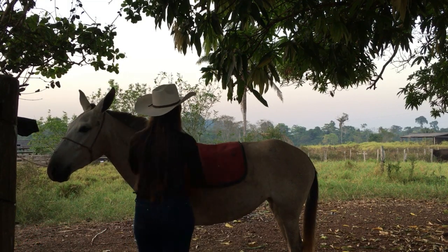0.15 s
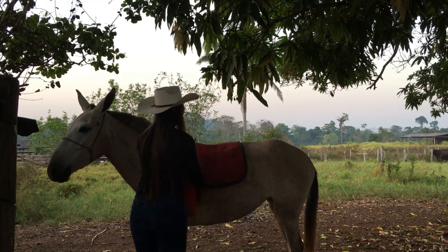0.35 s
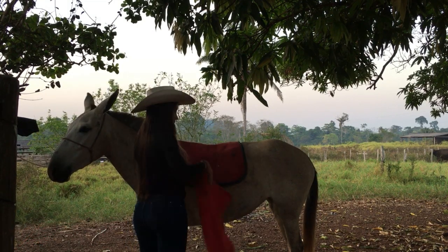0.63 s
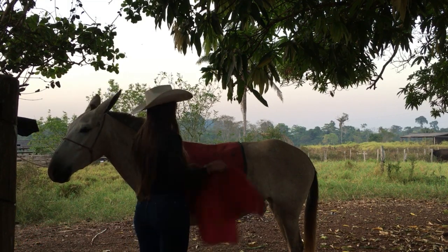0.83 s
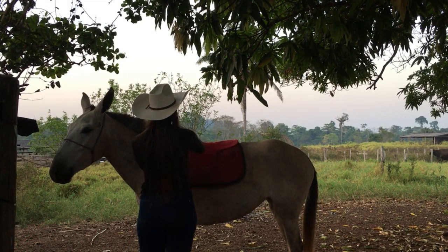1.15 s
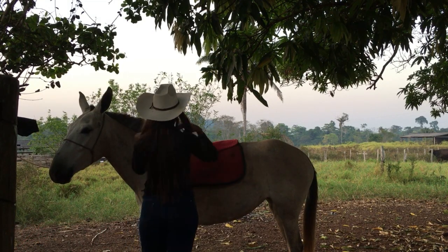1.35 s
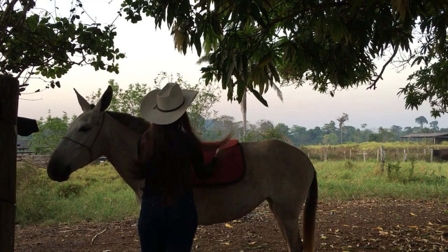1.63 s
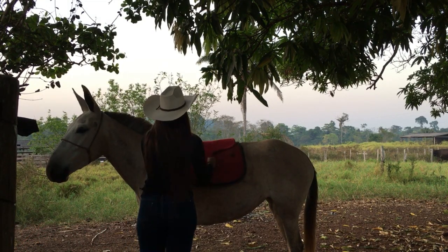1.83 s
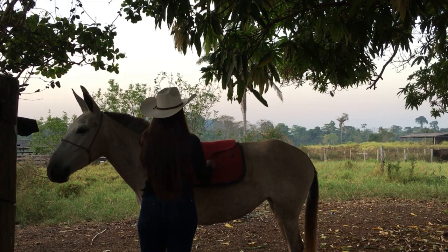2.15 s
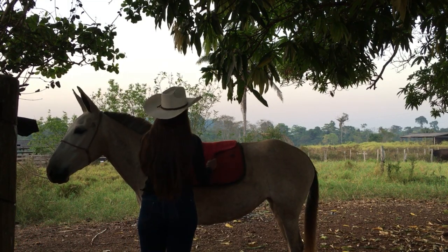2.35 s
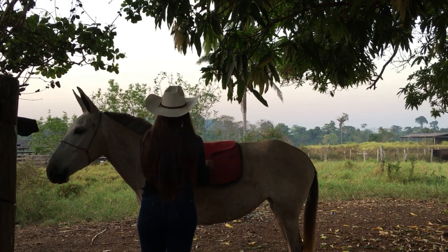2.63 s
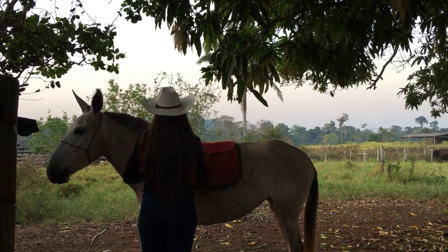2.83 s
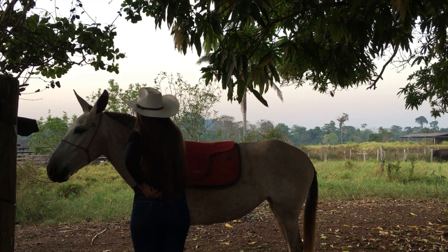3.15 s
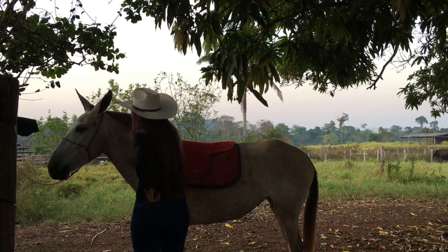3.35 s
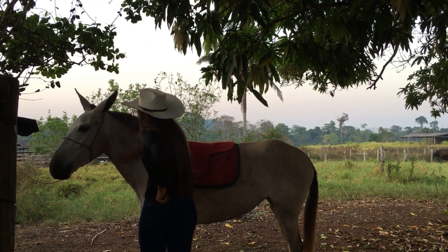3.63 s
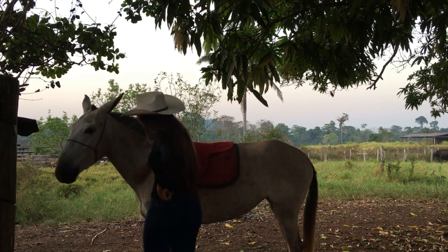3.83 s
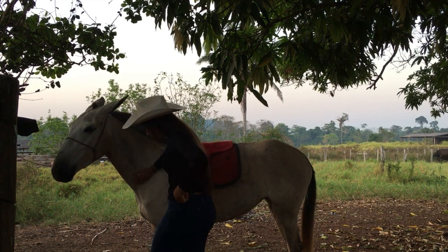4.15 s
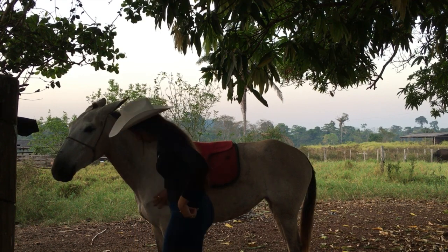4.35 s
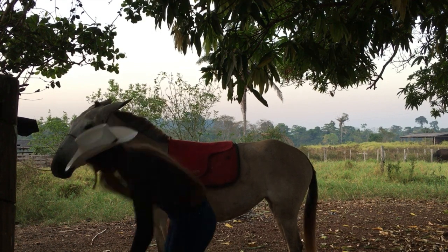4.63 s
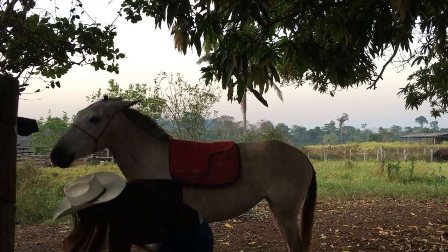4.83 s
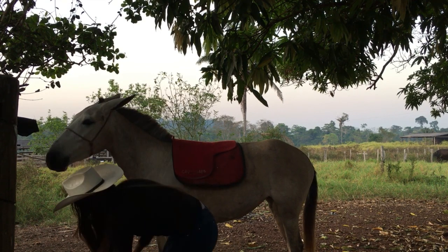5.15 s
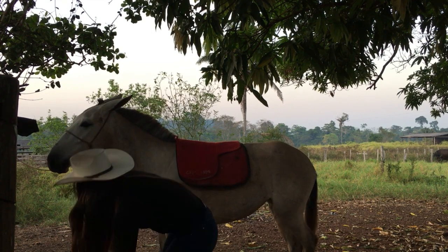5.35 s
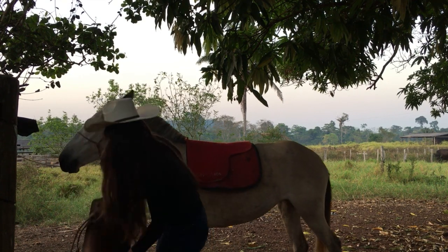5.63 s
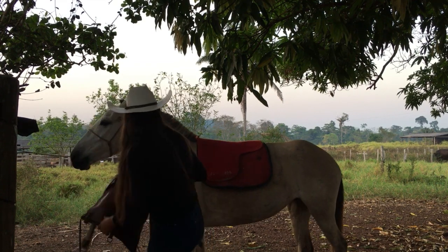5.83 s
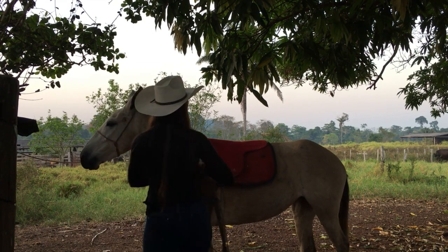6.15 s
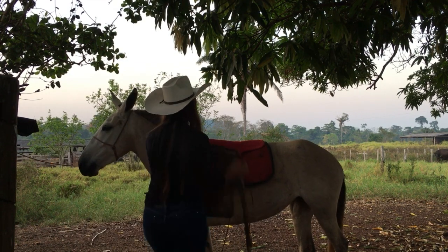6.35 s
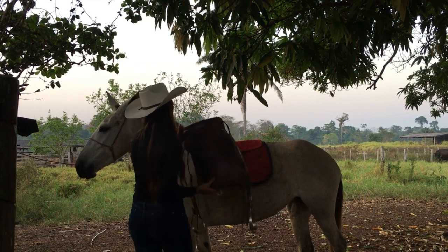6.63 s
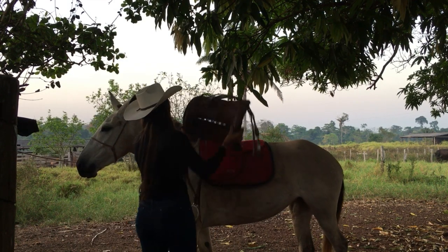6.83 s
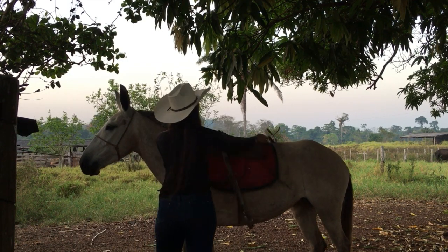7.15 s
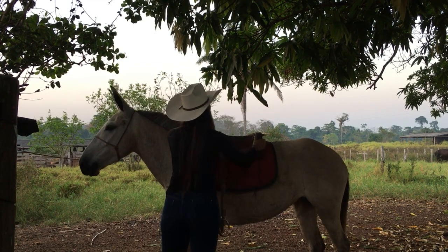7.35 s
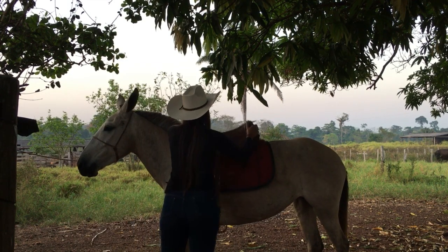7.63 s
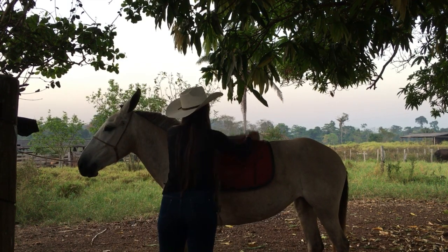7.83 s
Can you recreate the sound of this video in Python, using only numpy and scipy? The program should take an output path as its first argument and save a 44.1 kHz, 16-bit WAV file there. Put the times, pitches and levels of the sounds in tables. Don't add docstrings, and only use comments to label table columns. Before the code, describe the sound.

Close saddle handling with cloth rustle, leather cracks and one loud steel clink, over low drawn-out moos, a mule's squeal and chirping birds.

```python
import sys
import numpy as np
from scipy import signal
from scipy.fft import rfft, irfft, next_fast_len
from scipy.io import wavfile
from scipy.ndimage import uniform_filter1d

SR = 44100
rng = np.random.default_rng(int(sys.argv[2]) if len(sys.argv) > 2 else 0)


def to_wav(s):
    ch = np.atleast_2d(s).T
    pcm = np.round(np.clip(ch, -1, 1) * 32767)
    wavfile.write(sys.argv[1], SR, pcm.astype(np.int16))


def amplitude_ratio(level_db):
    exponent = np.asarray(level_db, float) / 20
    return 10 ** exponent


N = 352338
TIME = np.arange(N) / SR
LONG = next_fast_len(N)
GRID_HZ = np.arange(1, LONG // 2 + 2) * SR / LONG

# centre_hz, width_hz, level_db
MULE_HEAD = [(285.43, 24, -7.5), (531, 62, -19), (765.4, 170, -9.5), (1105, 132, 4), (1583, 120, -18),
             (2060, 320, -15), (2560, 192, -52), (3010, 1190, -18.5)]


def bull():
    # start_s, pitch_hz, effort_db, mouth_opening_db
    lowing = [
        [(2.13, 47, -60.5, -33.5), (2.222, 51.44, -59, -44.5), (2.376, 66.2, -54.5, -17),
         (2.47, 86, -55.5, -38), (2.51, 91.6, -55.5, -8), (2.658, 96.63, -51, -8.5), (2.772, 86.6, -48, -13),
         (2.864, 81.5, -51, -12), (3.0, 63.9, -64.5, -7.5)],
        [(3.95, 59, -58.5, -1.5), (4.008, 74.08, -55.5, -32.5), (4.064, 84.25, -51, -15),
         (4.32, 135.7, -49.5, -1), (4.4, 148.2, -50, -5), (4.572, 144.6, -49.5, -5), (4.76, 136.9, -49.5, -7)],
        [(4.73, 80, -46.5, -3.5), (4.832, 82.7, -45.5, -13), (4.99, 73.54, -76, -0.5)],
        [(5.84, 77.94, -59.5, -20), (5.942, 81.71, -49.5, -12), (6.0, 108.1, -49, -9.5),
         (6.07, 148, -49.5, -4.5), (6.17, 152.7, -50.5, 0.5), (6.29, 125, -52, 5.5)],
        [(6.27, 135.2, -46.5, -1), (6.35, 122.7, -47, -8), (6.45, 140, -44.5, -9), (6.56, 141.4, -50.5, -3.5)],
        [(6.53, 86, -45, -14), (6.585, 78, -45.5, -8.5), (6.65, 72.2, -58.5, -5), (6.7, 68.4, -68, 2)],
    ]
    roughness = [.07, .2, .14, .27, .11, .1]
    # lowest_partial_db re effort, half_pitch_db
    registers = [(-3.5, -14), (-7, -5.5), (-7.5, -18.5), (-7, -5), (-6, -4), (-5, -13)]
    # frequency_hz, level_db
    chest_boom = [(35, -4.5), (60, 21.5), (150, 9), (240, 7.5), (295, -1.5), (330, -17), (450, -34.5)]
    # centre_hz, width_hz, level_db
    mouth_modes = [(618, 74, -8), (856, 108, 0), (1115.4, 119.6, -2), (1402, 77, -14), (1873, 503, -16.5)]
    breath_db, patchy_db = -15, 3
    out = np.zeros(N)
    breath = coloured(rng.standard_normal(N), [(300, 10.0), (900, 7.0), (2400, -11.5), (5000, -40)])
    for rows, rough, (low_db, half_db) in zip(lowing, roughness, registers):
        span, gate, (hz, effort_db, open_db) = played(rows, 0.022)
        waves = [wave for f, wave in partials(hz / 2, rough, count=56, wobble=0.6, shimmer_db=19)]
        upper = sum(waves[3::2]) + amplitude_ratio(half_db) * sum(waves[2::2])
        chest = shaped(upper * gate, at_hz(chest_boom, GRID_HZ))
        mouth = shaped(upper * gate, resonances(GRID_HZ, mouth_modes) * (GRID_HZ > 450))
        mouth_gain = amplitude_ratio(open_db + patchy_db * drift(8.95, len(hz)))
        voice = amplitude_ratio(low_db) * even(waves[1]) + even(chest)
        voice += mouth_gain * (even(mouth) + amplitude_ratio(breath_db) * breath[span])
        out[span] += gate * amplitude_ratio(effort_db) * voice
    return out


def stirrup():
    # start_s, crack_db, chatter_db
    clink = (7.1718, -11, -32)
    # frequency_hz, level_db, build_up_s, t60_s
    struck_modes = [(1599, -36, .001, .2), (1756, -42, .001, .1), (3187, -30, .002, .25),
                    (4791, -25, .001, .06), (5249, -24, .002, .15), (5843, -36, .001, .05),
                    (7208, -21, .012, .14), (7553, -40, .002, .2), (8829, -32, .001, .1),
                    (9356, -41, .005, .25), (9913, -23, .003, .5), (11079, -30, .006, .2),
                    (11504, -32, .001, .1), (11736, -23, .001, .07), (11951, -32, .001, .08),
                    (12742, -26, .001, .09), (13164, -33, .004, .13), (13322, -24.5, .006, .3),
                    (13950, -22, .001, .09), (14174, -33, .001, .08), (15380, -24, .001, .06)]
    # frequency_hz, level_db, t60_s
    free_modes = [(1600, -56, .8), (3022, -58, 1.), (4800, -49, .8), (5257, -46, 2.), (7188, -48, .35),
                  (7618, -44, .25), (8870, -54, .25), (9290, -63, .8), (9916, -32, .11), (10685, -46, .12),
                  (11115, -50, .2), (11618, -55, 2.), (12715, -51, .18), (13290, -61, 1.), (13982, -62, .8),
                  (15435, -61, 2.)]
    damped_s, damped_db = 7.2, -60
    held_s, held_db, held_treble_db = 7.266, -10, -20
    flicker_db = 3
    uneven = .17
    hit_s, crack_db, chatter_db = clink
    at, t = int(hit_s * SR), TIME[:SR // 4]
    now = t + hit_s
    grip = amplitude_ratio(np.interp(now, [damped_s - .003, damped_s + .012], [0, damped_db]))
    hold = amplitude_ratio(np.interp(now, [held_s - .004, held_s + .006, held_s + .1], [0, 1, 1.8]))

    mid = amplitude_ratio(crack_db - 60 * t / 0.0156) * np.diff(rng.standard_normal(len(t) + 1)) / 2
    mid += grip * amplitude_ratio(chatter_db - 60 * t / 0.195) * np.diff(rng.standard_normal(len(t) + 1))
    side = 0
    modes = []
    for hz, db, build_s, t60 in struck_modes:
        modes.append((hz, grip * amplitude_ratio(db - 60 * t / t60) * (1 - np.exp(-t / build_s))))
    for hz, db, t60 in free_modes:
        held = hold ** (held_db + held_treble_db * (hz > 8000))
        modes.append((hz, (1 - grip) * held * amplitude_ratio(db - 60 * (now - damped_s) / t60)))
    for (hz, level), turn in zip(modes, rng.random(len(modes))):
        level = level * amplitude_ratio(flicker_db * drift(60, len(t)))
        phase = 2 * np.pi * (hz * t + turn)
        mid = mid + level * np.sin(phase)
        side = side + uneven * (hz > 4000) * (4800 / hz) ** 1.4 * level * np.cos(phase)
    out = np.zeros((2, N))
    out[:, at:at + len(t)] = mid + side, mid - side
    return out


def all_knocks():
    # start_s, thud_db, thud_hz
    boots = [(0.06, -48, 885), (0.426, -50, 330), (0.686, -51, 685), (0.779, -52.5, 418),
             (1.163, -45.5, 334), (2.96, -37.5, 525), (4.6, -48.5, 157.6), (5.025, -40, 267),
             (5.041, -39.5, 267), (5.068, -45, 297), (5.308, -36.5, 249), (5.328, -37, 244),
             (5.405, -42.5, 395), (5.593, -43.5, 284)]
    # start_s, thud_db, thud_hz
    flaps = [(5.521, -50, 147), (5.803, -45.5, 181), (6.668, -49, 184), (6.778, -39.5, 600),
             (7.067, -41.5, 794), (7.085, -49, 500), (7.12, -39, 432), (7.135, -40, 419), (7.153, -42, 427),
             (7.65, -54.5, 530), (7.911, -50, 381)]
    # start_s, slap_db, snap_db
    straps = [
        (4.836, -52, -56),
        (5.447, -50, -46.5),
        (5.601, -67, -42),
        (5.62, -40.5, -40),
        (6.235, -51, -48),
        (6.669, -73.5, -42.5),
        (7.303, -51, -43.5),
        (7.416, -45, -43),
        (7.502, -40, -66),
        (7.83, -52, -55.5),
    ]
    knocks_list = [(s, db, hz, db - 57, db - 48) for s, db, hz in boots]
    knocks_list += [(s, db, hz, db - 6, db - 43.5) for s, db, hz in flaps]
    knocks_list += [(s, db - 20, 600, db, snap_db) for s, db, snap_db in straps]
    return knocks_list


def knocks():
    crunch_db, crunch_t60_s = -7.5, 0.074
    out, t = np.zeros(N), TIME[:SR // 6]
    events = all_knocks()
    noise = rng.standard_normal((len(events), 4, len(t)))
    slap_band = signal.butter(2, [1300, 4500], "band", fs=SR, output="sos")
    snap_band = signal.butter(2, [5500, 15500], "band", fs=SR, output="sos")
    grit_band = signal.butter(2, [550, 1500], "band", fs=SR, output="sos")
    no_boom = signal.butter(2, 130, "high", fs=SR, output="sos")
    for (s, thud_db, hz, slap_db, snap_db), (push, slap, snap, grit) in zip(events, noise):
        thud = signal.sosfilt(no_boom, ring(push * amplitude_ratio(-60 * t / 0.11), hz, 4.6 / hz))
        hit = amplitude_ratio(thud_db) * thud / np.abs(thud).max()
        hit += amplitude_ratio(slap_db) * signal.sosfilt(slap_band, slap) * amplitude_ratio(-60 * t / 0.1066)
        hit += amplitude_ratio(snap_db - 1.5) * signal.sosfilt(snap_band, snap) * amplitude_ratio(-60 * t / 0.041)
        grit = signal.sosfilt(grit_band, grit ** 3) * amplitude_ratio(-60 * t / crunch_t60_s)
        hit += amplitude_ratio(thud_db + crunch_db) * grit / np.abs(grit).max()
        at = int((s - .001) * SR)
        out[at:at + len(t)] += hit[:N - at]
    return out


def landings():
    # start_s, level_db
    pushes = [
        (1.164, -49),
        (7.141, -42),
        (7.195, -43.5),
    ]
    s, db = np.transpose(pushes)
    train = np.zeros(N)
    train[(s * SR).astype(int)] = amplitude_ratio(db)
    soft = np.convolve(train, np.hanning(300) / 150)[:N]
    return ring(soft, hz=78.6, t60=0.19)


def rustle():
    # frequency_hz, level_db per Hz
    cloth = [(1500, -13), (3000, 10.5), (6000, 9.5), (9000, 5), (10600, -2.5), (12000, 2), (16000, -26)]
    # frequency_hz, level_db per Hz
    drag = [(60, -9), (150, -11), (400, 0), (1000, -0.5), (2500, -5.5), (5000, -17)]
    # time_s, bright_db
    handling = [(0, -80.5), (.4, -85.5), (.8, -86), (1.1, -94.5), (3.3, -83.5), (4.1, -80), (4.6, -83.5),
                (5.0, -87.5), (5.12, -74), (5.5, -71), (5.85, -81), (6.15, -84), (6.4, -75.5), (7.0, -83),
                (7.3, -70), (7.48, -76), (7.56, -65.5), (7.72, -78), (7.99, -77.5)]
    # start_s, length_s, bright_db, dull_db
    strokes = [(0.071, 0.044, -88, -59), (1.173, 0.071, -70, -61), (1.863, 0.078, -80, -67.5),
               (2.993, 0.0519, -82, -61.5), (3.671, 0.3, -78, -62), (4.614, 0.28, -78, -64),
               (5.446, 0.029, -60.5, -51), (5.699, 0.103, -71, -62), (6.014, 0.0524, -70.5, -55),
               (6.658, 0.035, -80.5, -71), (7.045, 0.0454, -67.5, -61), (7.131, 0.0927, -72.5, -46),
               (7.412, 0.0085, -73, -66), (7.496, 0.073, -65.5, -56.5), (7.647, 0.0455, -67, -55.5),
               (7.825, 0.0424, -65, -62.5)]
    drag_db, drag_follows, stroke_edge_db = -63.5, 0.6, -5
    grains = rng.standard_normal((2, N)) * amplitude_ratio(3.32 * np.minimum(rng.exponential(1, (2, N)), 5))
    bright = coloured(grains[0] * amplitude_ratio(1.8 * drift(40, N)), cloth)
    dull = coloured(grains[1] * amplitude_ratio(2.42 * drift(17.9, N)), drag)
    busy_db = np.interp(TIME, *np.transpose(handling))
    levels = np.array([busy_db, drag_db + drag_follows * (busy_db + 78.5)])
    for s, length, bright_db, dull_db in strokes:
        away = np.minimum(abs(2 * (TIME - s) / length - 1), 3)
        stroke = np.array([[bright_db], [dull_db]]) + stroke_edge_db * (away * away) ** 2
        levels = np.maximum(levels, stroke)
    return amplitude_ratio(8.5 + levels[0]) * bright + amplitude_ratio(levels[1]) * dull


def ticks():
    # start_s, peak_db, centre_hz
    creaks = [(.428, -53.5, 5000), (.698, -54, 1500), (4.441, -49, 2800), (4.598, -44, 5840),
              (4.608, -54, 12000), (4.682, -57.5, 8990), (4.733, -50, 10000), (4.776, -46, 4023),
              (4.837, -38, 6060), (4.839, -40, 2490), (5.104, -50, 2100), (5.125, -49, 1300),
              (5.152, -52.5, 700), (5.185, -47.5, 900), (5.224, -46.5, 3300), (5.311, -40, 895),
              (5.328, -33.5, 830), (5.332, -49, 3000), (5.406, -40.5, 553), (5.453, -43, 2980),
              (5.522, -53.5, 3000), (5.578, -50, 10000), (5.728, -49, 11000), (5.882, -52, 7950),
              (5.926, -63.5, 9000), (5.944, -60, 6000), (6.21, -52, 6000), (6.67, -51.5, 3000),
              (6.734, -59, 4000), (6.778, -35, 2300), (6.783, -53, 2600), (7.078, -42.5, 2000),
              (7.119, -43, 1500), (7.136, -39, 1500), (7.131, -47.5, 6000), (7.158, -44, 12050),
              (7.2045, -24, 14450), (7.319, -48.5, 8000), (7.417, -35, 7000), (7.503, -35, 1944),
              (7.512, -37, 4500), (7.52, -49.5, 7000), (7.553, -49.5, 12000), (7.568, -43, 8000),
              (7.627, -56, 12000), (7.651, -42.5, 2480), (7.677, -56, 8000), (7.69, -58, 11000),
              (7.708, -53.5, 13000), (7.762, -48, 5400), (7.815, -49, 12000), (7.835, -44.5, 2500),
              (7.912, -45.5, 1000), (7.93, -47, 1990)]
    cycles, scuff_s, reach = 9.0, .012, 1.35
    out, t = np.zeros(N), TIME[:SR // 25]
    for (s, db, hz), puff in zip(creaks, rng.standard_normal((len(creaks), len(t)))):
        band = signal.butter(2, [hz / reach, min(hz * reach, .4 * SR)], "band", fs=SR, output="sos")
        tick = signal.sosfilt(band, puff * amplitude_ratio(-60 * t / (scuff_s + cycles / hz)))
        at = int(s * SR)
        out[at:at + len(t)] += amplitude_ratio(db) * tick / np.abs(tick).max()
    return out


def jingles():
    # start_s, level_db
    taps_by_part = [
        [(5.243, -68), (5.33, -64), (6.118, -70), (6.237, -43)],
        [(5.243, -62), (5.622, -60.5), (6.118, -56)],
        [(5.106, -72), (5.16, -65.5), (5.243, -61.5), (5.292, -54), (5.35, -60), (5.601, -56.5), (4.682, -73)],
        [(5.255, -63), (5.31, -63), (5.34, -62), (5.62, -44.5)],
    ]
    # frequency_hz, level_db, t60_s
    buckle = [(3170, -12.5, 0.18), (4790, -12.5, 0.13), (7616, 0.5, 0.085), (8600, -16, 0.33),
              (9890, -7.5, 0.104), (10730, -14, 0.24), (11620, -17.5, 5.0), (12330, -24.5, 0.031),
              (13300, -5, 0.0818), (15450, -17, .1)]
    small_ring = [(6600, -9.5, 0.31), (8987, 4, 0.14)]
    iron = [(3183, -5, 0.092), (5440, -10, .15), (7670, -5, 0.039), (8880, -3.5, 0.041),
            (9820, -6.5, 0.059), (10690, -5, 0.039), (11080, -1, 0.051), (11630, -10.5, 0.115),
            (13320, -9.5, .08), (13950, -2.5, 0.051)]
    clasp = [(3430, -1, 0.028), (5850, -14, .05), (6350, -4, 0.064), (7120, 0.5, 0.044), (8193, -9.5, .055),
             (9566, -9, .08), (11060, -16, .09), (13170, -14, .06), (14300, -10, .05), (14760, -7.5, .035)]
    out = np.zeros(N)
    parts = (buckle, small_ring, iron, clasp)
    for modes, taps, spread_db in zip(parts, taps_by_part, (2.93, 3.0, 6.3, 4.54)):
        s, db = np.transpose(taps)
        for hz, level_db, t60 in modes:
            train = np.zeros(N)
            train[(s * SR).astype(int)] = amplitude_ratio(db + level_db + spread_db * rng.standard_normal(len(s)))
            out += ring(train, hz, np.clip(t60, .02, .16))
    return out


def squeal():
    # start_s, pitch_hz, level_db
    rise = [(2.99, 286.6, -76), (3.088, 343, -64.5), (3.186, 361.4, -56), (3.298, 366.9, -42),
            (3.385, 364, -44.5), (3.4, 366, -37.5), (3.515, 366.8, -33.5), (3.528, 363.1, -53),
            (3.6, 375.4, -49)]
    # centre_hz, width_hz, level_db
    shut_head = [(344, 320, -4), (1014, 266, 2)]
    opened = caller([rise], MULE_HEAD, count=7, gain_db=-2, rough=0.13, breath_db=-9, half_db=-1)
    shut = caller([rise[:3]], shut_head, count=6, gain_db=5, rough=0.05, breath_db=-12, half_db=-2)
    return opened + shut


def pants():
    # start_s, rise_s, length_s, pitch_hz, level_db
    breaths = [
        (3.208, 0.15, 0.24, 523.6, -56.5),
        (3.517, 0.04, 0.0814, 527.6, -53.5),
        (3.624, 0.055, 0.0751, 514.7, -53.5),
        (3.762, 0.0157, 0.085, 507.4, -53),
        (3.921, 0.0377, 0.087, 513.1, -58),
        (3.981, 0.0347, 0.064, 511.2, -50),
        (4.191, 0.14, 0.157, 509.5, -58),
    ]
    notes = []
    for s, rise, length, hz, db in breaths:
        edge_hz = hz * 1.015
        notes.append(swell(s, rise, length, [edge_hz, hz, edge_hz], db, start_db=-8, end_db=-5))
    return caller(notes, MULE_HEAD, count=5, gain_db=9.0, rough=0.22, breath_db=-5, fade_s=.006)


def far_cow():
    # start_s, pitch_hz, level_db
    calls = [
        [(2.2, 109.8, -75), (2.33, 107.5, -65.5), (2.376, 116.2, -61), (2.482, 116, -59), (2.556, 114.9, -62.5),
         (2.712, 108.4, -59.5), (2.77, 105.9, -66.5), (2.88, 106.9, -82)],
        [(7.33, 115.5, -64), (7.558, 120.7, -57), (7.68, 113.3, -68.5), (7.72, 111.5, -62.5)],
    ]
    # centre_hz, width_hz, level_db
    far_mouth = [(1521.3, 59, 10.5), (1813, 317, 0), (2000, 360, -6), (2447, 440, -9.5), (3750, 1080, -7.5)]
    return caller(calls, far_mouth, count=32, gain_db=1, rough=0.03, breath_db=-14)


def buzzing_bird():
    # start_s, length_s, top_hz, bottom_hz, level_db
    buzzes = [(0.51, .04, 4700, 4350, -63.5), (0.537, 0.147, 5377, 4743, -56),
              (0.658, 0.1267, 5670, 5083, -53.5), (0.78, 0.1205, 5950, 5200, -56),
              (0.863, 0.09, 5340, 4898, -61.5), (1.099, 0.3, 5710, 5010, -67),
              (2.636, 0.156, 5603, 5090, -50), (2.778, 0.071, 6157, 5254, -59),
              (2.842, 0.0763, 5470, 5070, -57.5), (3.088, .2, 5444, 5100, -67),
              (6.788, 0.065, 4750, 4515, -62), (6.818, 0.042, 5250, 4800, -59.5),
              (6.837, 0.17, 5630, 5190, -53), (6.977, 0.075, 5910, 5093, -55)]
    late_s, rise_s, start_db, fall_db_per_s, sag_hz_per_s = .008, 0.0074, 3.5, -58.5, -900
    flips_per_s, lean, edge_hz = 360, .75, 120
    out = np.zeros(N)
    for s, length, top, bottom, db in buzzes:
        pitches = [top, top, top + sag_hz_per_s * length]
        note = swell(s + late_s, rise_s, length, pitches, db, start_db, fall_db_per_s * length)
        span, gate, (hz, level_db) = played(note, 0.005)
        flip = 1 - np.tanh(1.6 * drift(flips_per_s, len(hz)) + lean)
        phase = 2 * np.pi * np.cumsum(hz - (top - bottom) / 2 * flip) / SR
        chop = rms_one(amplitude_ratio(3.53 * drift(130, len(hz))))
        below_edge = signal.cheby1(8, 1, top + edge_hz, fs=SR, output="sos")
        tone = signal.sosfilt(below_edge, chop * np.sin(phase)) + amplitude_ratio(-20.0) * chop * np.sin(2 * phase)
        out[span] += gate * amplitude_ratio(level_db + 3.0) * tone
    return out


def whistling_birds():
    # start_s, length_s, first_hz, last_hz, level_db
    whistles = [(.478, .08, 6050, 6400, -65), (.5, .13, 4100, 2850, -71), (.55, .1, 7600, 7200, -81),
                (.68, .065, 8000, 8700, -67), (1.3, .22, 1846, 1846, -80), (1.35, .11, 8000, 8400, -71),
                (1.38, .05, 3165, 3165, -75), (2.11, .05, 5600, 5800, -68), (2.146, .125, 5680, 5600, -60),
                (2.15, .075, 2200, 1850, -71), (2.15, .085, 3450, 3850, -71), (2.148, .12, 7900, 7500, -76),
                (3.765, .082, 6450, 7350, -58), (3.845, .069, 7900, 7600, -62),
                (3.84, .065, 5950, 5700, -63), (3.93, .26, 1320, 1320, -64), (4.185, .075, 6800, 7400, -70),
                (6.38, .05, 7600, 8500, -69), (6.42, .085, 7000, 7900, -60), (6.425, .15, 4030, 3200, -67),
                (6.49, .09, 7000, 6450, -65), (6.493, .05, 8700, 8600, -65), (6.535, .045, 8700, 8300, -68),
                (3.77, .085, 4000, 3300, -68), (4.11, .05, 3900, 2600, -67), (4.25, .12, 3150, 3250, -69),
                (6.73, .125, 2250, 2250, -70), (6.735, .045, 3200, 3200, -72), (6.79, .07, 8150, 8000, -72),
                (6.91, .08, 3450, 3450, -70), (6.925, .065, 2250, 2200, -70), (7.62, .085, 500, 500, -63),
                (7.75, .035, 2230, 2230, -68), (7.265, .038, 2230, 2230, -60), (7.6, .095, 6150, 6400, -64),
                (7.675, .09, 6300, 5400, -63)]
    rise_share, blur_share, blur_hz = 0.48, .16, 15
    out = np.zeros(N)
    for s, length, first, last, db in whistles:
        peak = first + (last - first) * rise_share
        note = swell(s, length * rise_share, length, [first, peak, last], db, start_db=-1, end_db=-5.5)
        span, gate, (hz, level_db) = played(note)
        waver = (blur_share * abs(last - first) + blur_hz) * drift(190, len(hz))
        phase = 2 * np.pi * np.cumsum(hz + waver) / SR
        out[span] += gate * amplitude_ratio(level_db + 4.0 + 3.3 * drift(47, len(hz))) * np.sin(phase)
    return out


def paddock(x, wet_db):
    # delay_s, level_db
    echoes = [
        (.021, -9),
        (.047, -8),
        (.083, -16.5),
        (.131, -20.5),
    ]
    dull = signal.lfilter([.4], [1, -.6], x)
    return x + sum(amplitude_ratio(db + wet_db) * np.roll(dull, int(s * SR)) for s, db in echoes)


def evening_air():
    # frequency_hz, level_db per Hz
    air_colour = [(15, -41.5), (25, -17.5), (64, 6), (97, 0.5), (263, -5), (394, -9), (489, -11),
                  (560, -10), (1100, -32), (2000, -20.5), (2350, -24), (4400, -16), (4870, -10.5),
                  (5300, -14.5), (5730, -20.5), (9320, -31.5), (16000, -41.5)]
    return amplitude_ratio(-65.5 + 1.06 * drift(2.986, N)) * coloured(rng.standard_normal(N), air_colour)


def caller(tables, tract, count, gain_db, rough, breath_db, half_db=None, fade_s=0.0083):
    out = np.zeros(N)
    breath = rms_one(shaped(rng.standard_normal(N), resonances(GRID_HZ, tract)))
    for rows in tables:
        span, gate, (hz, level_db) = played(rows, fade_s)
        tone = sum(resonances(f, tract) * wave for f, wave in partials(hz, rough, count, 1.0, rate=48.06))
        if half_db:
            halves = list(partials(hz / 2, rough / 2, count))[::2]
            tone += amplitude_ratio(half_db) * sum(resonances(f, tract) * wave for f, wave in halves)
        out[span] += gate * amplitude_ratio(level_db + gain_db) * (even(tone) + amplitude_ratio(breath_db) * breath[span])
    return out


def partials(pitch_hz, rough, count, wobble=2.956, shimmer_db=11.0, rate=25.07):
    phase = 2 * np.pi * np.cumsum(pitch_hz) / SR + wobble * rough * drift(rate, len(pitch_hz))
    for k in range(1, count + 1):
        flicker = amplitude_ratio(shimmer_db * rough * drift(rate, len(pitch_hz)))
        yield k * pitch_hz, flicker * np.sin(k * phase + rng.uniform(0, 2 * np.pi))


def resonances(hz, modes):
    return sum(amplitude_ratio(db) / (1 + (2 * (hz - centre) / width) ** 2) for centre, width, db in modes)


def ring(clicks, hz, t60):
    r, w = amplitude_ratio(-60 / (t60 * SR)), 2 * np.pi * hz / SR
    first = np.argmax(clicks != 0)
    rung = signal.lfilter([0, np.sin(w)], [1, -2 * r * np.cos(w), r * r], clicks[first:] + 1e-18)
    return np.pad(rung, (first, 0))


def swell(s, rise_s, length_s, pitches_hz, db, start_db, end_db):
    return np.transpose([[s, s + rise_s, s + length_s], pitches_hz, [db + start_db, db, db + end_db]])


def played(rows, fade_s=0.0195):
    s, *columns = np.transpose(rows)
    span = slice(int(s[0] * SR), min(int(s[-1] * SR), N))
    t = TIME[span]
    gate = np.clip(np.minimum(t - s[0], s[-1] - t) / fade_s, 0, 1)
    return span, gate, [np.interp(t, s, c) for c in columns]


def drift(rate, size):
    r, run_in = np.exp(-2 * np.pi * rate / SR), int(SR / rate)
    noise = rng.standard_normal(size + run_in)
    return rms_one(signal.lfilter([1], [1, -2 * r, r * r], noise)[run_in:])


def rms_one(x):
    return x / np.sqrt(np.mean(x ** 2) + 1e-20)


def even(x, length_s=0.15):
    return x / np.sqrt(uniform_filter1d(x ** 2, int(length_s * SR)) + 1e-12)


def at_hz(points, hz):
    points_hz, points_db = np.transpose(points)
    return amplitude_ratio(np.interp(np.log(hz), np.log(points_hz), points_db))


def shaped(x, gains):
    return irfft(rfft(x, LONG) * gains, LONG)[:x.shape[-1]]


def coloured(x, points):
    return rms_one(shaped(x, at_hz(points, GRID_HZ) * (GRID_HZ > points[0][0] / 2)))


def scene():
    animals = paddock(bull() + birds(), wet_db=-2.5)
    animals += paddock(far_cow() + squeal() + pants(), wet_db=-3.0)
    bed = shaped(rustle() + ticks() + jingles() + evening_air(), GRID_HZ < 15850)
    return animals + bed + knocks() + landings() + stirrup()


def birds():
    return buzzing_bird() + whistling_birds()


def top_cut(x):
    return signal.sosfilt(signal.butter(12, 17150, fs=SR, output="sos"), x)


def record(dry):
    cut = signal.sosfilt(signal.cheby2(10, 50, 17200, fs=SR, output="sos"), dry)
    return top_cut(cut)


dry = scene()
out = record(dry)
to_wav(out)
```